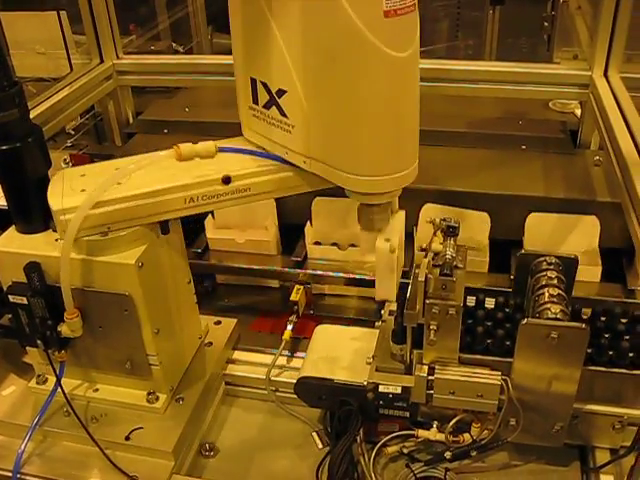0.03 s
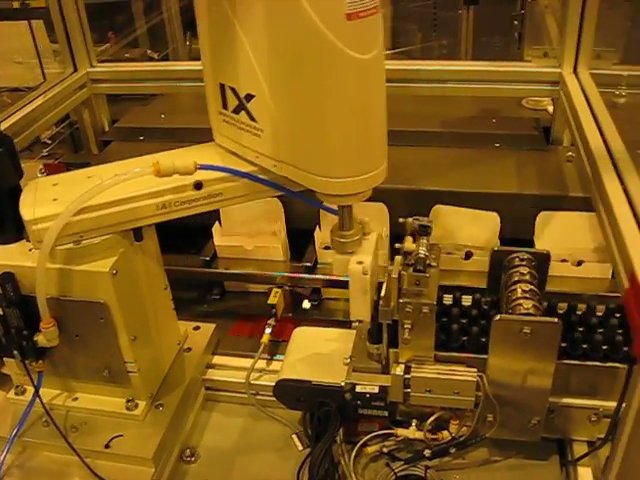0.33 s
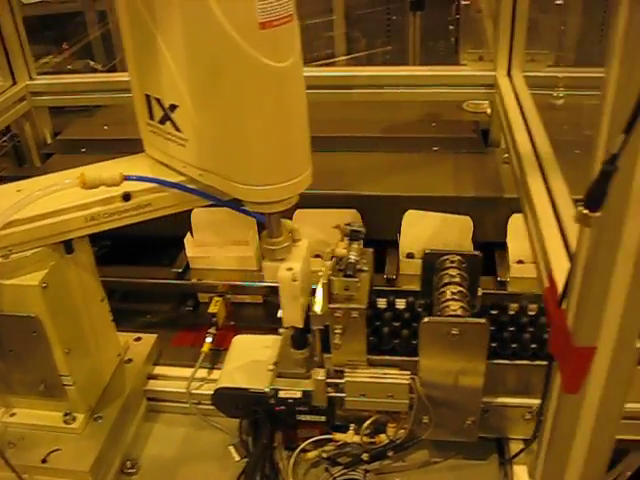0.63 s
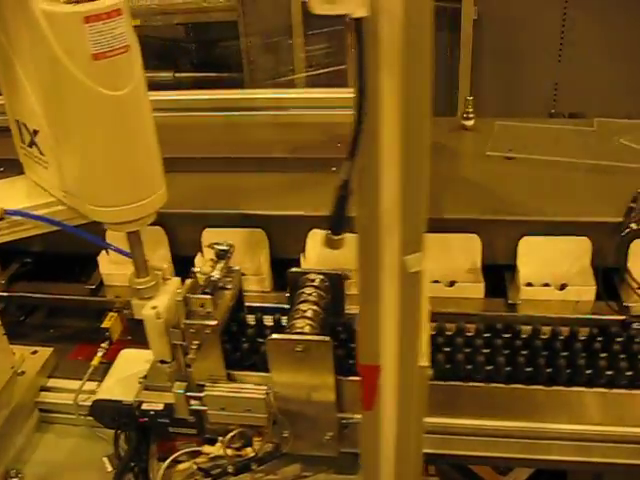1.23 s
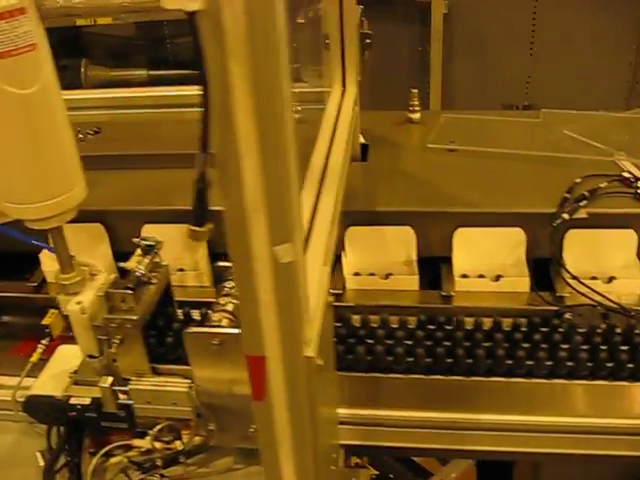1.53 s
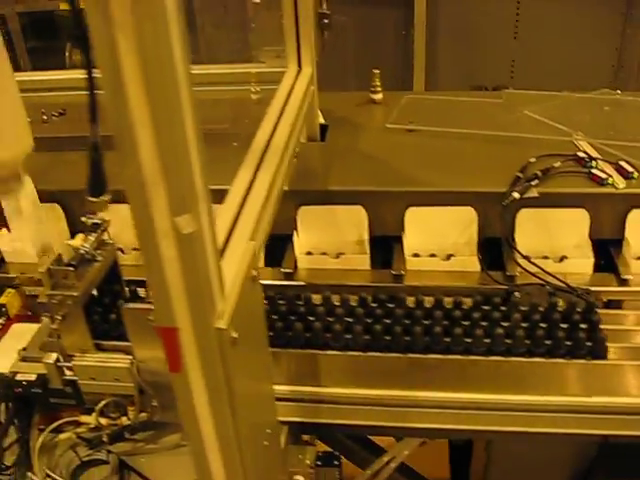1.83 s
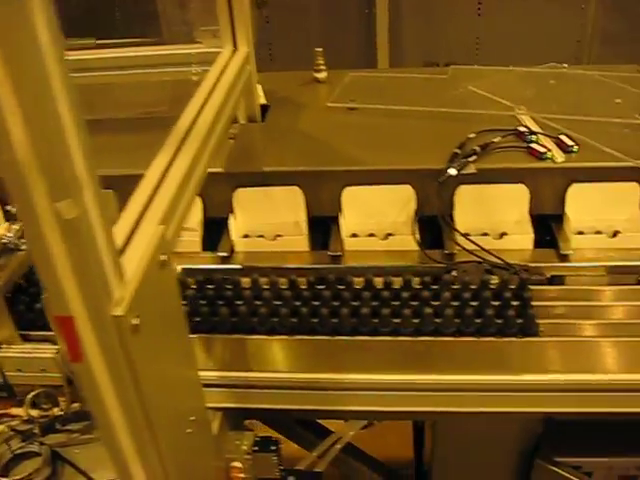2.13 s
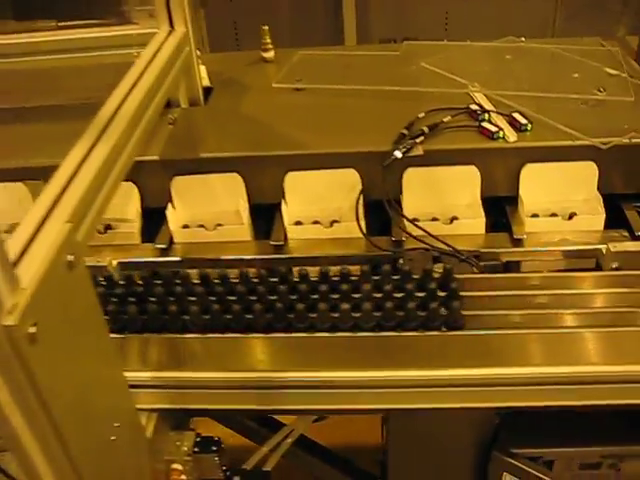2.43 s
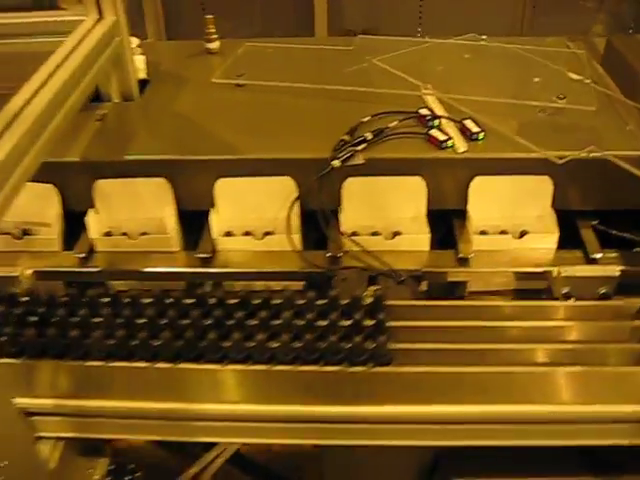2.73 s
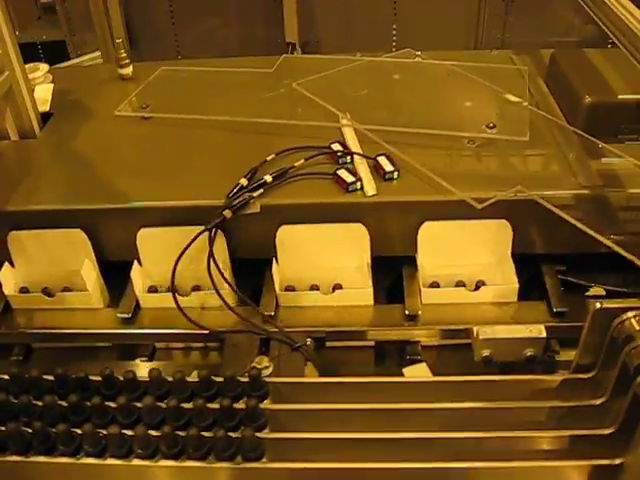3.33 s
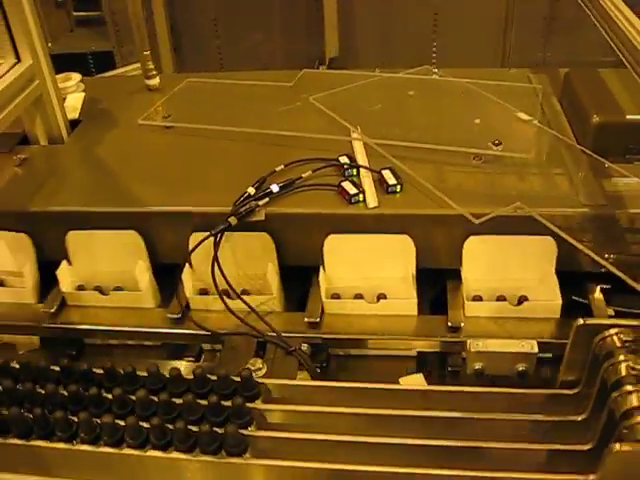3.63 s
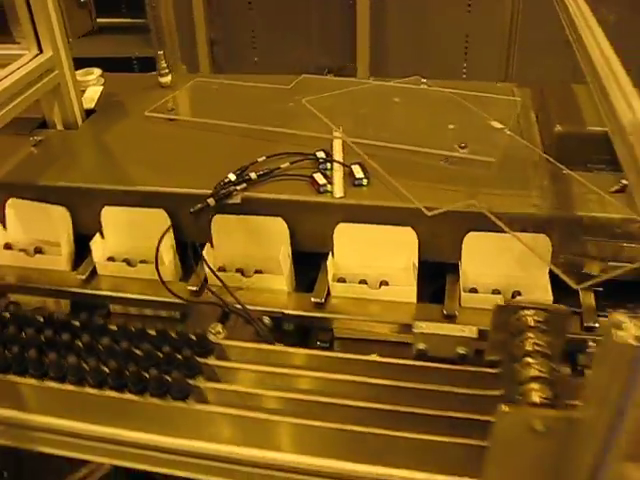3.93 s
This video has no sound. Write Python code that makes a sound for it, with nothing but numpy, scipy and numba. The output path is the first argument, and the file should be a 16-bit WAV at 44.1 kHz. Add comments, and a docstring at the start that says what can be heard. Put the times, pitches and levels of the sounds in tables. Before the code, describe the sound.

A pneumatic factory machine blasts hissing air, then clacks and clicks over its constant drone.

```python
"""A nozzle blows compressed air for a second and a half: turbulent jet noise with whistling resonances.
It belongs to a pneumatic loading machine in a factory hall. Cylinders knock on their stops and excite
the frame's modes, a loose panel rings, valves click and puff, and air leaks over the hum of the drives.
The hall reverberates the blows. A gain control ducks everything under the jet and recovers slowly."""
import sys
import numpy as np
from scipy import signal
from scipy.fft import rfft, irfft
from scipy.io import wavfile
from scipy.ndimage import uniform_filter1d, map_coordinates
from numba import njit

SR = 44100
rng = np.random.default_rng(int(sys.argv[2]) if len(sys.argv) > 2 else 0)


def wav_record(signal):
    """Record a signal, one row per channel, as 16-bit PCM in the file named by sys.argv[1]."""
    frames = np.transpose(np.atleast_2d(signal))
    bounded = np.clip(frames, -1, 1)
    # unit amplitude maps onto the largest positive 16-bit level
    quanta = np.round(bounded * 32767).astype(np.int16)
    wavfile.write(sys.argv[1], SR, quanta)


N = 176400

# envelope of the blast: time_s, level_db
JET_ENVELOPE = [(.905, -60), (.915, -17), (.93, -7.5), (1.1, -6), (1.55, -5), (1.85, -5), (2.1, -5.5),
                (2.27, -7.5), (2.31, -6.5), (2.335, -8.5), (2.37, -54)]
# broadband spectrum of the jet: frequency_hz, density_db
JET_SPECTRUM = [(100, -31), (450, -40), (750, -37), (1100, -10), (3500, -5), (4500, -9.5), (8000, -7),
                (10000, -11), (13000, -10.5), (15000, -20), (17000, -14)]
# whistling resonances that swell and fade in the blast: centre_hz, width_hz, gain_db, peak_s, span_s
JET_RESONANCES = [(1065, 120, -5.5, 1.75, 1), (1443, 294, 2, 1.7, 0.69), (2294, 183, 10, 2.01, 0.73),
                  (2560, 140, 8.5, 2.09, 0.39), (2530, 280, 3, 1.2, 0.33), (2934, 280, 6.5, 0.93, 0.94),
                  (3400, 220, -1, 2.13, 0.87), (3810, 160, 1.5, 1.75, 0.29), (4960, 130, -1, 1.38, 0.37),
                  (5660, 250, -2, 1.87, 0.63), (6390, 230, 6.5, 0.63, 1), (6880, 400, 4, 1.86, 0.34),
                  (7180, 180, 3.5, 1.22, 0.33), (7720, 150, -2, 1.1, .4), (8090, 140, 5, 1.53, 0.5),
                  (8600, 430, 0, 1.1, 0.19), (8900, 140, -3, 2.3, .14), (11000, 140, 0, 1.44, 0.12),
                  (11160, 400, -4.5, 1.2, .2), (11700, 270, -7.5, 1.76, 0.26), (13500, 380, -18, 0.6, 0.54),
                  (15700, 900, -14, 1.2, 0.94)]
# reflections from the enclosure walls: first_delay_s, last_delay_s, gain_ratio
WALL_REFLECTIONS = [(.0021, .0029, 0.12), (.0047, .0038, 0.17), (.0083, .0095, .25)]
def nozzle(fade_db=-3.5, flutter_db=3.2):
    """Turbulence excites resonances; interference with moving reflections comb-filters the jet."""
    start_s, end_s = JET_ENVELOPE[0][0], JET_ENVELOPE[-1][0]
    progress = np.clip((times() - start_s) / (end_s - start_s), 0, 1)
    jet = amp(fade_db * progress) * coloured(JET_SPECTRUM)
    for hz, width_hz, db, peak_s, span_s in JET_RESONANCES:
        swell = np.exp(-((times() - peak_s) / span_s) ** 2)
        jet += amp(db + flutter_db * wobble(11)) * swell * band(hz, width_hz, skirt=1.73)
    jet += sum(gain * map_coordinates(jet, [(times() - first - (last - first) * progress) * SR])
               for first, last, gain in WALL_REFLECTIONS)
    blowing = (progress > 0) & (progress < 1)
    return blowing * amp(curve(JET_ENVELOPE)) * jet / np.std(jet[blowing])


# cylinders hitting their stops: start_s, thud_db, pitch_ratio, clack_db, clack_t60_s
STOP_IMPACTS = [(.001, -8.5, 0.91, -6.5, 0.025), (0.2478, -8, 1.36, -7.5, 0.046),
                (.273, -37, 1.2, -25, 0.057), (0.335, -1, 0.85, -8, 0.016), (0.48, -40, 0.96, -19, 0.082),
                (0.516, -35, 2, -15, .05), (0.9114, -6.5, 0.96, -3, 0.018), (1.8487, 11, 1.09, 1.5, 0.06),
                (2.236, 1, 0.89, -4.5, 0.035), (2.269, -11, 0.8, 2, 0.093), (2.373, 1, 1.65, -4.5, 0.087),
                (2.388, -13, 1, -2, 0.015), (2.428, -5, 0.98, -1.5, 0.088), (2.4862, -28, 0.66, 0, 0.016),
                (2.511, -13, 1.9, -4, 0.035), (3.157, -30, 0.67, -21, 0.27), (3.2465, 4, 1.19, -4, 0.015),
                (3.5144, -32, 1.1, -16, 0.027), (3.583, 3, 0.92, -1.5, 0.02)]
# normal modes of the frame: pitch_hz, gain_db, t60_s
FRAME_MODES = [(133, -18.5, 0.038), (231.5, -1, 0.021), (317, 0.5, 0.022), (428, -0.5, 0.016),
               (786, -10, 0.045)]
# spectrum of the fittings' clack: frequency_hz, density_db
CLACK_SPECTRUM = [(100, -49), (450, -14.5), (750, 1.5), (1250, 1), (1700, -6), (2800, -8.5), (4500, -19),
                  (9000, -18), (17000, -55)]
def cylinder_knocks():
    """Impact excitation: each stop thuds through the frame's modes and clacks in its fittings."""
    out = np.zeros(N)
    for start_s, thud_db, pitch_ratio, clack_db, t60 in STOP_IMPACTS:
        out += amp(thud_db) * ring(FRAME_MODES, start_s, pitch_ratio)
        out += amp(clack_db) * burst(start_s, 0.0001, t60) * unit(coloured(CLACK_SPECTRUM))
    return out


# valve and latch contacts: peak_s, level_db, centre_hz, t60_s
VALVE_CONTACTS = [(0.246, -15, 2430, 0.026), (0.329, -16, 3020, 0.092), (0.334, -24, 3500, .04),
                  (0.5146, -10, 3000, 0.07), (0.517, -21, 6700, 0.11), (.9045, -18, 6480, 0.022),
                  (0.914, -12, 2730, 0.096), (1.8483, 5.5, 9000, 0.013), (2.2706, 4.5, 3020, 0.022),
                  (2.303, 1.5, 6800, 0.018), (2.387, 0.5, 3850, 0.038), (2.485, -40, 4000, 0.029),
                  (3.158, -28, 4500, 0.024), (3.172, -35, 6940, 0.018), (3.244, -10, 7500, 0.024),
                  (3.2445, -10.5, 4670, 0.028), (3.248, -4, 2230, 0.022), (3.503, -20, 3000, 0.052),
                  (3.5784, -11, 2900, 0.017), (3.584, -12, 2970, 0.064)]
def valve_clicks():
    """Brief metal contacts have broad spectra: each is a bright, fast-decaying band of noise."""
    return sum(amp(db) * burst(s, .0004, t60) * unit(band(hz, 0.88 * hz, skirt=3.15, ripple_db=2))
               for s, db, hz, t60 in VALVE_CONTACTS)


# exhaust puffs and sliding strokes: peak_s, level_db, centre_hz, rise_s, t60_s
EXHAUST_PUFFS = [(.055, -27.5, 2010, 0.045, .2), (0.094, -17.5, 2640, 0.016, 0.15),
                 (0.104, -16, 7050, 0.0093, 0.099), (.187, -24, 2830, 0.015, 0.079),
                 (0.276, -18, 2570, 0.0046, 0.055), (.36, -21, 2390, 0.0088, 0.18),
                 (.467, -26, 5000, 0.0053, 0.059), (.482, -13.5, 3000, .012, 0.048),
                 (.502, -19, 2940, 0.0056, 0.095), (0.798, -18, 7660, .006, .12),
                 (2.322, -5.5, 8600, 0.0039, 0.04), (2.389, -5.5, 6640, 0.0024, 0.029),
                 (2.398, -5, 3070, 0.015, 0.55), (2.43, -17, 7660, 0.016, .08),
                 (2.585, -13, 2450, 0.08, 0.57), (2.59, -24, 5200, 0.073, 0.56),
                 (2.885, -26, 2800, 0.095, 0.37), (3.172, -23.5, 2560, 0.035, 0.062),
                 (3.2, -22, 930, 0.039, 0.2), (3.359, -18, 6500, 0.0093, 0.21),
                 (3.345, -21, 1300, 0.022, 0.26), (3.432, -20, 2960, 0.0054, 0.098),
                 (3.669, -25.5, 6800, 0.0036, 0.044), (3.738, -14, 3150, 0.014, 0.16),
                 (3.822, -20, 3220, 0.0065, 0.075), (3.932, -22, 2780, 0.0035, 0.14)]
def exhaust_puffs():
    """Turbulent outflow swells at an exhaust port and decays as the cylinder empties."""
    return sum(amp(db) * burst(s, rise_s, t60) * unit(band(hz, width_hz=hz, skirt=2.43, ripple_db=2))
               for s, db, hz, rise_s, t60 in EXHAUST_PUFFS)


# blows on the loose guard panel: start_s, gain_db
PANEL_IMPACTS = [(0.2493, -20), (2.273, -8), (2.4871, 3), (2.514, 3.5), (3.5155, -9)]
# normal modes of the panel: pitch_hz, gain_db, t60_s
PANEL_MODES = [(312, -15, 0.31), (710, -11, .05), (844, 3, 0.055), (1020, -1, .05), (1108, 1.5, 0.072),
               (1130, 0, 0.057), (1250, 2, 0.035), (1575, -1.5, 0.041), (2290, -22, .05)]
def guard_panel():
    """Free vibration of a struck plate: its inharmonic modes give a hollow ring."""
    return sum(amp(db) * ring(PANEL_MODES, s) for s, db in PANEL_IMPACTS)


# blows on a small steel part: start_s, gain_db
STEEL_IMPACTS = [(2.272, -10), (2.388, -7)]
# normal modes of the part: pitch_hz, gain_db, t60_s
STEEL_MODES = [(6150, 4, .12), (9780, -3, 0.33)]
def steel_ping():
    """A small, stiff body has high natural frequencies, so it gives a thin ping."""
    return sum(amp(db) * ring(STEEL_MODES, s) for s, db in STEEL_IMPACTS)


# envelope of the running machine: time_s, level_db
DRONE_ENVELOPE = [(0, -24.5), (.45, -26), (.6, -26), (.9, -27.5), (2.3, -22), (2.65, -17.5), (2.85, -28),
                  (3.05, -27.5), (3.2, -25.5), (3.6, -23), (4, -27.5)]
# spectrum of its drone: frequency_hz, density_db
DRONE_SPECTRUM = [(25, -17), (55, -7), (95, -9.5), (210, -9.5), (330, -13.5), (560, -3), (800, 1),
                  (1100, 3.5), (1500, -3.5), (2900, -5), (4500, -15.5), (8000, -22), (11000, -39),
                  (17000, -53)]
def drive_drone():
    """The drives radiate broadband noise, slowly modulated in amplitude."""
    return amp(curve(DRONE_ENVELOPE) + .6 * wobble(25)) * unit(coloured(DRONE_SPECTRUM))


# envelope of the leak at the gripper: time_s, level_db
LEAK_ENVELOPE = [(0, -35.5), (.07, -25.5), (.2, -31.5), (.45, -35), (.6, -32.5), (.8, -33), (.92, -30),
                 (2.25, -44), (2.5, -51), (3.22, -50), (3.34, -36), (3.6, -38), (4, -42)]
# spectrum of its hiss: frequency_hz, density_db
LEAK_SPECTRUM = [(1500, -12), (4000, -1), (6500, 3.5), (9000, 3), (13000, -1.5), (17000, -2.5)]
def air_leak():
    """Small-scale turbulence at a leak in the air lines makes a thin hiss."""
    return amp(curve(LEAK_ENVELOPE) + 0.2 * wobble(11)) * unit(coloured(LEAK_SPECTRUM))


# line spectrum of the motors: pitch_hz, rms_db
MOTOR_PARTIALS = [(538, -44), (770, -42.5), (1028, -39.5), (1238, -42), (1800, -41), (2285, -69),
                  (3015, -48)]
def motor_hum(flutter_db=0.5, mains_hz=120, mains_db=-44.5):
    """Periodic vibration: steady mains hum under motor tones that wander in level and phase."""
    hum = amp(mains_db) * np.sin(2 * np.pi * mains_hz * times())
    for hz, db in MOTOR_PARTIALS:
        level = amp(db + flutter_db * wobble(9.3))
        drift_rad = 0.37 * np.sqrt(hz / 500) * wobble(25)
        hum += level * np.sin(2 * np.pi * hz * times() + drift_rad)
    return np.sqrt(2) * hum


# envelope of the moving arm's rumble: time_s, level_db
RUMBLE_ENVELOPE = [(0, -32.5), (.4, -33.5), (.85, -34), (1.1, -41), (2.2, -38.5), (2.8, -45.5), (3.05, -37),
                   (3.3, -31.5), (4, -33.5)]
def arm_rumble():
    """Random vibration of the moving arm, shaped by one broad, low resonance."""
    return amp(curve(RUMBLE_ENVELOPE) + wobble(18)) * unit(band(310, width_hz=444, skirt=1.97))


# one move of the arm's servo: time_s, pitch_hz, rms_db
SERVO_GLIDE = [(3.001, 3650, -48), (3.05, 3920, -37.5), (3.12, 4100, -41), (3.2, 3860, -44),
               (3.25, 3600, -60)]
def servo_whine(scatter_ratio=0.094):
    """A faint whine rises and falls with the arm's speed; random frequency modulation roughens it."""
    s, hz, db = np.transpose(SERVO_GLIDE)
    jitter = scatter_ratio * unit(band(300, width_hz=500, skirt=0.61))
    pitch_hz = np.interp(times(), s, hz) * (1 + jitter)
    level = amp(np.interp(times(), s, db, left=-120, right=-120))
    return level * np.sqrt(2) * np.sin(2 * np.pi * np.cumsum(pitch_hz) / SR)


# reverberation time of the hall: frequency_hz, t60_s
HALL_DECAY = [(150, 0.19), (400, 0.26), (1000, 0.63), (4000, 0.23), (14000, 0.17)]
def hall(x):
    """Reverberation: convolution with a diffuse, decaying tail in which the midrange lasts longest."""
    hz, t, spectrum = signal.stft(rng.standard_normal(SR), SR, nperseg=256)
    decay = amp(-60 * t / along(HALL_DECAY, hz)[:, None])
    tail = signal.istft(spectrum * decay, SR, nperseg=256)[1]
    return signal.fftconvolve(x, tail / np.linalg.norm(tail))[:N]


def ring(modes, start_s, pitch_ratio=1):
    """Modal superposition: a struck body rings as damped sines, a little differently each time."""
    out, t = np.zeros(N + SR), np.arange(SR // 3) / SR
    struck = out[round(start_s * SR):][:len(t)]
    for k, (hz, db, t60) in enumerate(modes):
        decay = amp(db + rng.normal(0, 2.1) - 60 * t / t60)
        pitch_hz = pitch_ratio * hz * (1 + rng.normal(0, 0.0074))
        struck += (-1) ** k * decay * np.sin(2 * np.pi * pitch_hz * t)
    return out[:N] / 2


def band(hz, width_hz, skirt, ripple_db=0, ripple_hz=172.2):
    """Noise in one resonance; skirt 1 falls 6 dB an octave, and enclosure reflections ripple it."""
    knots_db = ripple_db * rng.standard_normal(1024)
    f = np.fft.rfftfreq(N, 1 / SR)
    ripple = amp(np.interp(f / ripple_hz, np.arange(len(knots_db)), knots_db))
    detuning = (f * f - hz * hz) / (f * width_hz + 1)
    return noise(ripple * (1 + detuning ** 2) ** (-skirt / 2))


def coloured(points):
    """Noise with a spectrum of (frequency_hz, density_db) points."""
    return noise(amp(along(points, np.fft.rfftfreq(N, 1 / SR))))


def noise(gain):
    """White noise filtered by one gain per frequency bin."""
    return irfft(rfft(rng.standard_normal(N)) * gain, N)


def burst(peak_s, rise_s, t60):
    """Exponential growth up to peak_s, then exponential decay."""
    t = times() - peak_s
    log_gain = np.minimum(t / rise_s, -np.log(1000) * t / t60)
    return np.exp(np.maximum(log_gain, -np.log(1e12)))


def wobble(rate):
    """A smooth random curve, rate knots a second."""
    return map_coordinates(rng.standard_normal(400), [times() * rate], mode="mirror")


def curve(rows):
    """Linear interpolation of (time_s, value) points."""
    return np.interp(times(), *np.transpose(rows))


def along(points, hz):
    """Interpolation of (frequency_hz, value) points on a log axis."""
    f, values = np.transpose(points)
    return np.interp(np.log(hz + 1), np.log(f + 1), values)


def amp(db):
    """Decibels to gain."""
    return 10 ** (np.asarray(db) / 20)


def unit(x):
    """x at rms 1."""
    return x / np.sqrt(np.mean(x ** 2) + 1e-20)


def times():
    """The time of every sample."""
    return np.arange(N) / SR


def scene(hall_db=-9.5):
    """Superposition of air, blows and drives; only the blows reverberate."""
    blows = cylinder_knocks() + valve_clicks() + guard_panel() + steel_ping()
    drives = motor_hum() + arm_rumble() + drive_drone() + servo_whine()
    air = air_leak() + nozzle() + exhaust_puffs()
    return (air + blows + drives + amp(hall_db) * hall(blows))[None]


@njit
def gain_cut_db(over_db, attack_s, release_s, charge_s, recover_db_per_s):
    """Two-stage compression: a fast stage for blows, a slow one that holds after long loud sounds."""
    out, fast, slow = np.zeros(len(over_db)), 0., 0.
    for i in range(len(over_db)):
        fast += (over_db[i] - fast) / (SR * (attack_s if over_db[i] > fast else release_s))
        if fast > slow:
            slow += (fast - slow) / (SR * charge_s)
        else:
            slow = max(slow - recover_db_per_s / SR, 0.)
        out[i] = max(fast, slow)
    return out


def record(dry, threshold_db=-13, treble_weight=3.252, low_cut_hz=53, top_hz=17400):
    """Automatic gain control ducks loud sound; saturation and band limiting follow."""
    x = dry[0]
    power = np.abs(uniform_filter1d(x ** 2 + (treble_weight * np.gradient(x)) ** 2, size=180))
    over_db = np.maximum(10 * np.log10(power + 1e-12) - threshold_db, 0)
    cut_db = gain_cut_db(over_db, attack_s=0.014, release_s=0.09, charge_s=0.6, recover_db_per_s=31)
    x = x * amp(-cut_db)
    x = x / (1 + x ** 6) ** (1 / 6)  # rounds off the peaks
    f = np.fft.rfftfreq(N, 1 / SR)
    high_pass = (1j * f / (low_cut_hz + 1j * f)) ** 2
    return irfft(rfft(x) * high_pass * (f < top_hz), N)[None]


dry = scene()
out = record(dry)
wav_record(out)
```